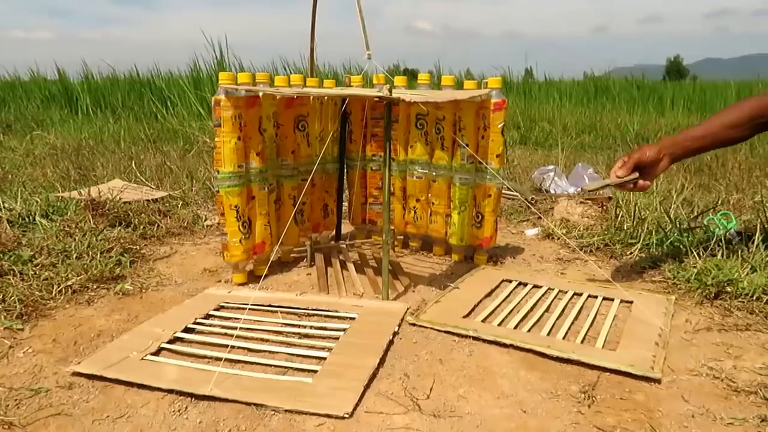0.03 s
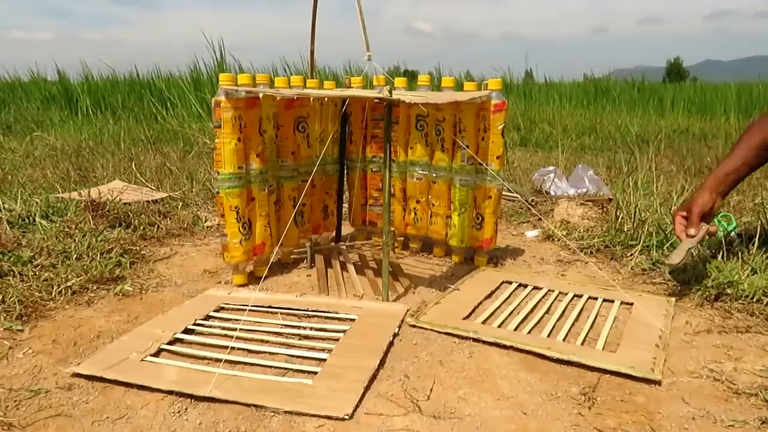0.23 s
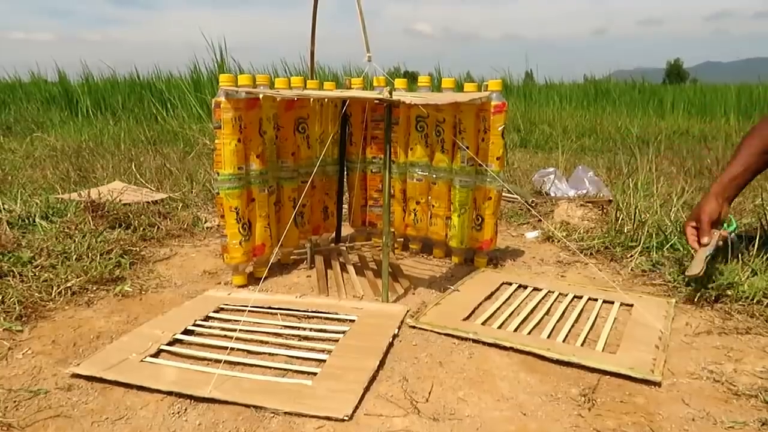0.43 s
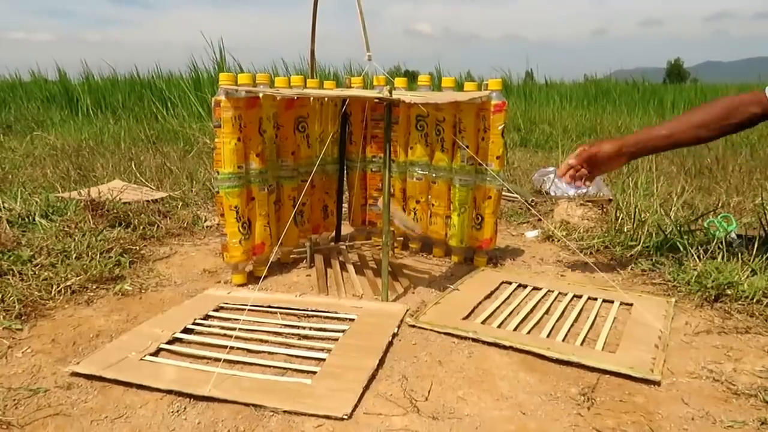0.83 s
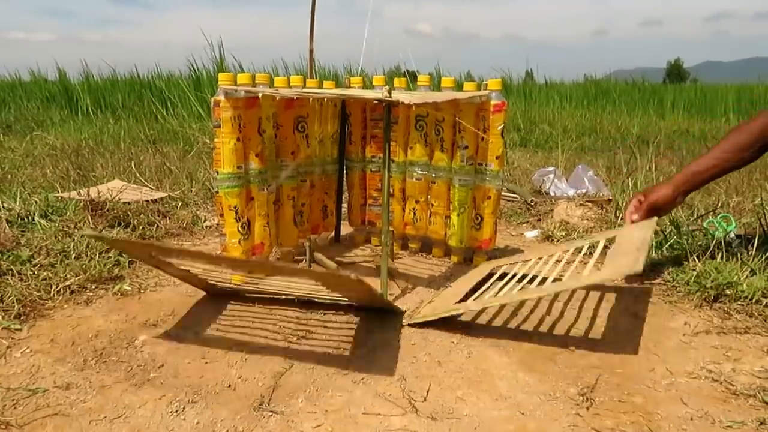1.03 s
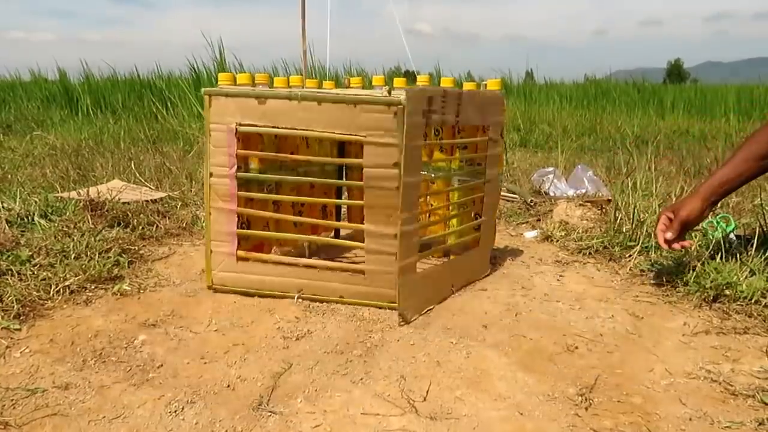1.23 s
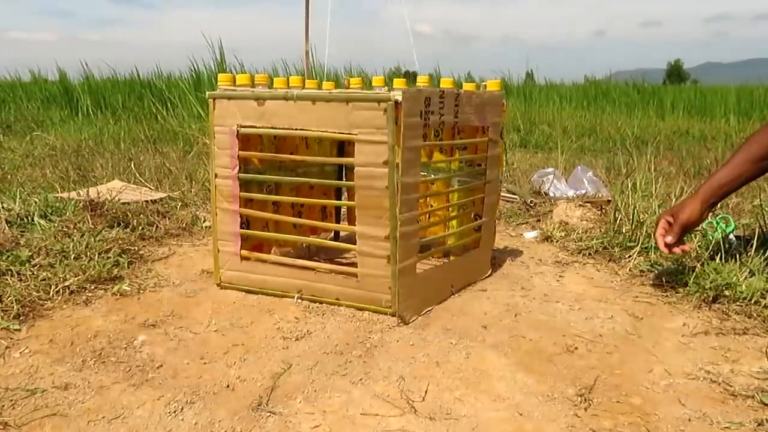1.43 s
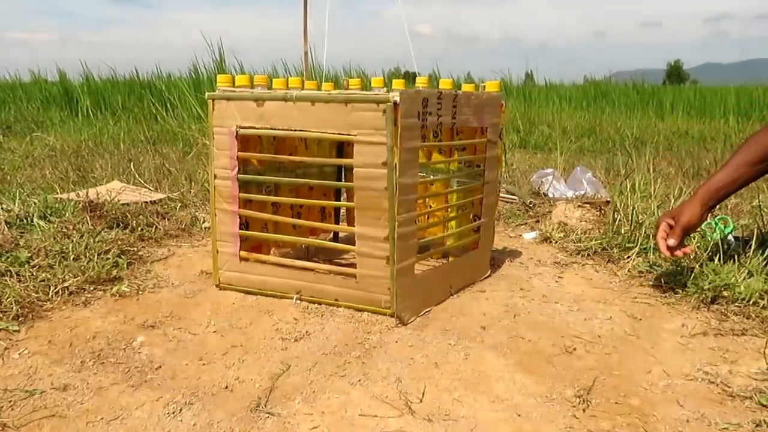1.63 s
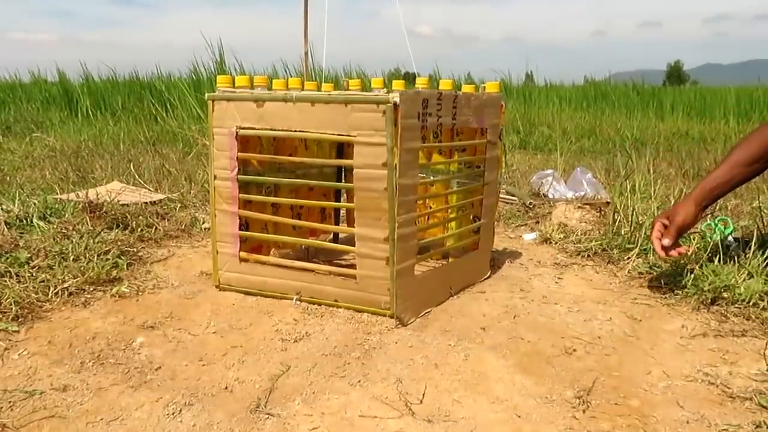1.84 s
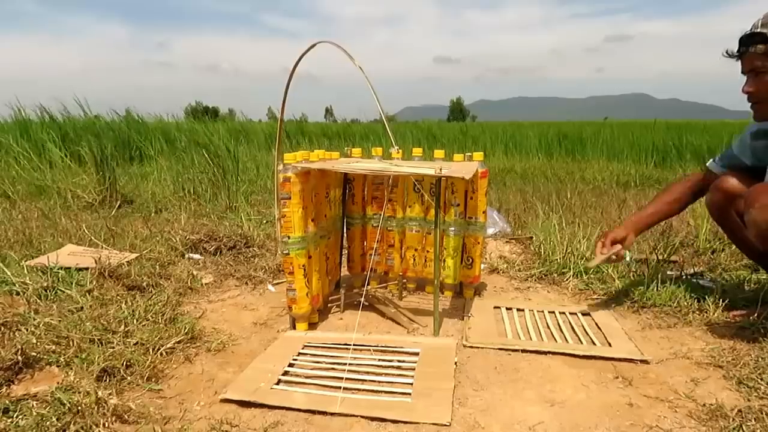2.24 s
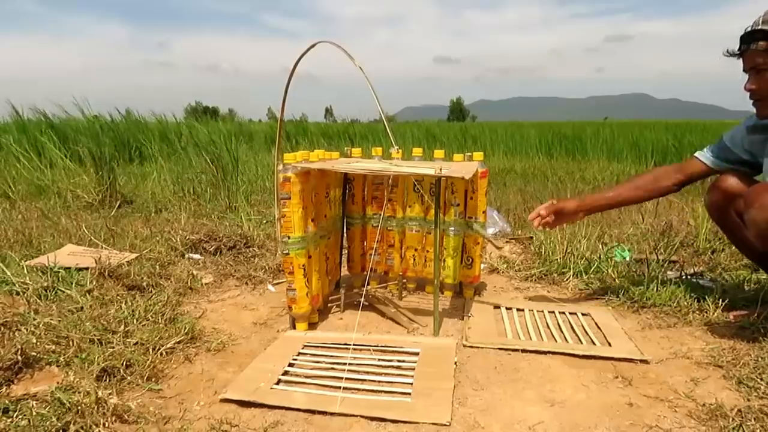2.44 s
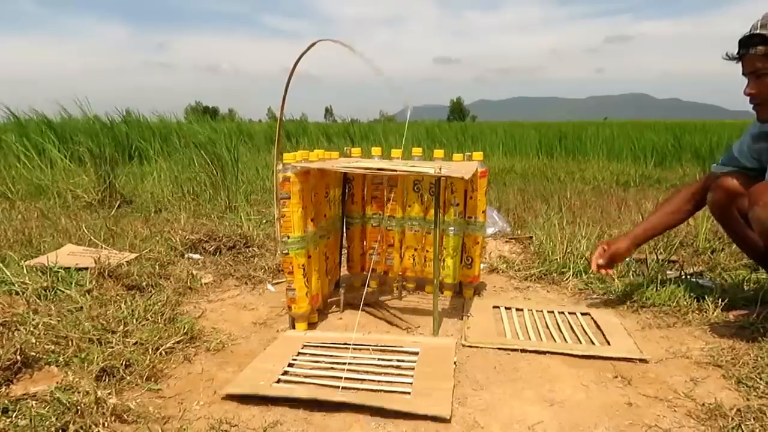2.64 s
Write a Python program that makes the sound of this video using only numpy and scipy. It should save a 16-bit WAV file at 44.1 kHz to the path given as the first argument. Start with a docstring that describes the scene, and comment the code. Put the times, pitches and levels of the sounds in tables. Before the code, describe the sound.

A cardboard trap snaps shut outdoors. For the first second, low wind rumbles on the microphone over faint grass hiss. At about 1.1 seconds cords rasp and crack, and the doors swing up with rustles, knocks and tiny squeaks. The loudest slap comes at 1.4 seconds, settling by 1.6. Just after 2 seconds the hiss drops away and the wind becomes a dull, lumpy flutter.

```python
"""A spring trap in a windy field

Grass hisses and wind buffets the microphone as a trap of cardboard and bamboo fires. Cords rasp,
snap and squeak over the frame, and two cardboard doors swing up rustling, slap shut and settle.
After about two seconds the hiss abruptly drops away and the wind becomes a higher, dull flutter."""
import sys
import numpy as np
from scipy import signal
from scipy.fft import rfft, irfft
from scipy.io import wavfile
from scipy.ndimage import uniform_filter1d, minimum_filter1d

SR = 44100
rng = np.random.default_rng(int(sys.argv[2]) if len(sys.argv) > 2 else 0)


def bounce(signal):
    """Save signal as a 16-bit WAV file at the path given by the first command-line argument."""
    frames = np.transpose(np.atleast_2d(signal))
    limited = np.clip(frames, -1, 1)
    pcm = np.round(limited * 32767).astype(np.int16)
    wavfile.write(sys.argv[1], SR, pcm)


N = 119070
TIME = np.arange(N) / SR
CHANGE_S, FADE_S = 2.057, 0.00406  # when the hiss and wind switch; how long a quick fade takes


def amp(db):
    """Turns decibels into a number to multiply by."""
    return 10 ** (np.asarray(db) / 20)


def unit(x):
    """Scales a signal to an average power of 1."""
    return x / np.sqrt(np.mean(x ** 2) + 1e-20)


def add(mix, start_s, sound):
    """Mixes a sound in at a given time."""
    part = mix[..., max(round(start_s * SR), 0):][..., :sound.shape[-1]]
    part += sound[..., :part.shape[-1]]


def fade_in(at_s):
    """A quick, smooth step from 0 to 1."""
    return .5 + .5 * np.tanh((TIME - at_s) / FADE_S * 2)


def level(rows, column=1):
    """Joins a table's levels into a volume curve that fades quickly at both ends."""
    rows = np.array(rows)
    gate = fade_in(rows[0, 0]) * (1 - fade_in(rows[-1, 0] + FADE_S))
    return gate * amp(np.interp(TIME, rows[:, 0], rows[:, column]))


def colour(x, tone):
    """Makes some pitches stronger than others, then scales to a power of 1."""
    tone_hz, db = np.transpose(tone)
    hz = np.fft.rfftfreq(x.shape[-1], 1 / SR)
    gain = amp(np.interp(np.log(hz + 1), np.log(tone_hz), db))
    return unit(irfft(rfft(x) * gain, x.shape[-1]))


def highpass(x, hz):
    """Removes the bass."""
    return signal.sosfilt(signal.butter(2, hz, 'high', fs=SR, output='sos'), x)


def stereo_noise(likeness, length=N):
    """Left and right noise, from unrelated (likeness 0) to identical (1)."""
    shared, left, right = rng.standard_normal((3, N))[:, :length]
    return np.sqrt(likeness) * shared + np.sqrt(1 - likeness) * np.array([left, right])


def wander(hz):
    """A smooth random wobble, up to about this many times a second."""
    rolloff = 1 + (np.fft.rfftfreq(N, 1 / SR) / hz) ** 4
    return unit(irfft(rfft(rng.standard_normal(N)) / rolloff, N))


def steadied(x, span_s):
    """Evens out chance swells that last longer than the span."""
    size = max(int(span_s * SR), 2)
    power = uniform_filter1d(uniform_filter1d((x ** 2).mean(0), size), size)
    return x / np.sqrt(abs(power) + 1e-9)


# The tone of the grass, early and late, and of the far wind. Each row: pitch in Hz, strength in dB.
HISS_TONE = [(180, -26), (300, 5.5), (431, 0), (700, -4), (968, -3), (2320, -7.5), (10100, -26),
             (12500, -33), (15500, -35.5)]
LATE_HISS_TONE = [(300, 0), (2000, 3), (4000, -2), (8000, -13), (12000, -26), (15500, -17)]
ROAR_TONE = [(100, -14.5), (240, 1.5), (450, -16), (2000, -73)]
# The breeze swelling in the grass. Each row: time in seconds, change of level in dB.
BREEZE = [(.1, 1.5), (.3, 1.9), (.42, -1.5), (.62, 0), (.76, 3.1), (.9, 2), (1.65, 1.5), (1.9, 2.5),
          (2.02, 2)]


def field(start_s=.068, hiss_db=-54, roar_db=-57.5, late_hiss_db=-66):
    """Grass hisses in the breeze over the low roar of far wind; later only a fainter hiss is left."""
    swell_db = np.interp(TIME, *np.transpose(BREEZE))
    hiss = amp(hiss_db + swell_db) * highpass(colour(stereo_noise(0.55), HISS_TONE), hz=201)
    roar = amp(roar_db) * colour(stereo_noise(0.63), ROAR_TONE)
    late_hiss = amp(late_hiss_db) * colour(stereo_noise(0.14), LATE_HISS_TONE)
    return np.where(TIME < CHANGE_S, (hiss + roar) * (TIME > start_s), late_hiss)


# How much the wind differs between left and right.
# Each row: time in seconds, level of the differing part against the shared part in dB.
WIND_WIDTH = [(0, -3.5), (.36, 4.5), (.42, -12.5), (.65, -3), (.95, -7), (1.1, -3.5), (1.45, -8.5),
              (2.04, -7.5), (2.065, 6), (2.335, 3.5), (2.355, -10), (2.7, -14)]


def eddies(tone, span_s, db_per_octave=5.5, top_hz=800):
    """Air swirls at the microphone's two openings; they share small swirls less than large ones."""
    thinner_tone = [(hz, db + db_per_octave * np.log2(min(hz / top_hz, 1))) for hz, db in tone]
    shared = steadied(colour(rng.standard_normal((1, N)), tone), span_s)
    differing = steadied(colour(rng.standard_normal((1, N)), thinner_tone), span_s)
    width = amp(np.interp(TIME, *np.transpose(WIND_WIDTH)))
    return shared + width * differing * np.array([[1], [-1]])


# The rise and fall of the early wind. Each row: time in seconds, level in dB.
RUMBLE_LEVELS = [(0.07, -33), (0.108, -30.5), (0.218, -26), (0.252, -38.5), (0.318, -20.5), (0.378, -25.5),
                 (0.396, -30.5), (0.456, -42.5), (0.556, -29), (0.612, -36), (0.638, -48), (0.7, -25.5),
                 (0.732, -46.5), (0.772, -50), (0.8, -29.5), (0.86, -22.5), (0.882, -37), (0.904, -51),
                 (0.938, -28.5), (0.988, -45.5), (1.176, -29.5), (1.204, -37), (1.302, -31), (1.346, -39),
                 (1.424, -29.5), (1.446, -47), (1.468, -40.5), (1.712, -50.5), (1.768, -38.5),
                 (1.934, -55.5), (1.984, -30.5), (2.057, -26.5)]
# The deep tone of the wind. Each row: pitch in Hz, strength in dB.
RUMBLE_TONE = [(15, -5), (28, -5), (55, 2.5), (125, 0.5), (190, -8.5), (270, -22), (400, -37.5),
               (800, -62.5), (2000, -97.5)]


def rumble():
    """Wind blowing on the microphone makes a deep, uneven rumble."""
    return level(RUMBLE_LEVELS) * (1 - fade_in(CHANGE_S)) * eddies(RUMBLE_TONE, span_s=0.05)


# Strong gusts. Each row: time of the peak in seconds, half length in seconds, relative level in dB.
GUSTS = [(0.293, 0.018, -30.5), (0.329, 0.003, -14.5), (0.373, 0.0061, -21.5), (0.646, 0.011, -25),
         (0.686, 0.0038, -26), (0.806, 0.005, -25), (0.853, 0.0087, -21), (0.875, 0.0044, -17.5),
         (0.919, 0.0052, -30.5)]
# The tone of a gust. Each row: pitch in Hz, strength in dB.
GUST_TONE = [(30, -16), (100, 7), (200, 5), (290, -4.5), (420, -16), (600, -31.5), (2500, -90)]


def gusts(gain_db=2):
    """Short gusts swell and die away on the microphone."""
    swells = sum(amp(gain_db + db) * np.exp(-.5 * ((TIME - peak_s) / half_s) ** 2)
                 for peak_s, half_s, db in GUSTS)
    return swells * eddies(GUST_TONE, span_s=0.031)


# Faint ticks of dry stalks. Each row: start in seconds, level in dB, pitch in Hz.
TICKS = [(.379, -38, 2550), (.524, -43.5, 2760), (.697, -41.5, 2650), (1.706, -48.5, 6300),
         (1.831, -41, 2360), (1.858, -45, 3965), (2.047, -42, 2797)]


def tick(db, hz, rise_s=0.00026, decay_s=0.003):
    """A dry stalk clicks softly."""
    t = np.arange(1024) / SR
    tone = [(hz / 4, -20), (hz * 0.48, -7), (hz, 0), (hz * 1.6, -10), (hz * 4, -25)]
    click = colour(stereo_noise(.2, len(t)), tone)
    return amp(db) * click * (1 - np.exp(-t / rise_s)) * np.exp(-t / decay_s)


def slips(per_s, spread_db, side_db):
    """Rubbing surfaces make many tiny clicks at random times, nearly alike left and right."""
    mid, side = rng.standard_normal((2, N))
    slipping = rng.random(N) < per_s / SR
    size = amp(spread_db * np.minimum(rng.exponential(1, N), 3))
    return slipping * size * (np.sign(mid) + amp(side_db) * side * np.array([[1], [-1]]))


# Cords running over the frame. Each row: time in seconds, level in dB.
RASP_LEVELS = [(1.059, -37.5), (1.063, -23.5), (1.072, -27), (1.082, -30.5), (1.086, -15.5), (1.092, -22),
               (1.099, -14.5), (1.107, -21), (1.113, -29), (1.122, -40), (1.135, -53), (1.165, -34.5),
               (1.170, -51), (1.179, -36.5), (1.186, -55.5)]
# The tone of their rasp. Each row: pitch in Hz, strength in dB.
RASP_TONE = [(300, -6.5), (600, -13), (1000, -8.5), (1500, -5), (2700, -0.5), (3500, -3), (4300, -8),
             (7600, -8.5), (10000, -13.5), (12000, -19), (14500, -36.5), (15500, -63)]


def cords():
    """Cords stick and slip over the frame as the bamboo spring pulls them."""
    rasp = colour(slips(per_s=6000, spread_db=-3.3, side_db=-21.5), RASP_TONE)
    return level(RASP_LEVELS) * steadied(highpass(rasp, hz=400), span_s=0.0054)


# The doors moving. Each row: time in seconds, level of the rustle in dB, level of the flexing in dB.
SWING_LEVELS = [(1.06, -60.5, -59), (1.10, -35.5, -39.5), (1.125, -37.5, -25), (1.156, -31, -38),
                (1.19, -42.5, -45.5), (1.22, -33, -34), (1.27, -39.5, -43), (1.305, -34, -34.5),
                (1.33, -40, -47.5), (1.386, -39, -34.5), (1.391, -42.5, -21.5), (1.408, -23.5, -29),
                (1.422, -31.5, -16.5), (1.447, -39.5, -24.5), (1.47, -42.5, -34.5), (1.485, -55.5, -33),
                (1.52, -42.5, -36), (1.545, -64, -41.5), (1.61, -60.5, -56)]
# The tones of rustling and flexing cardboard. Each row: pitch in Hz, strength in dB.
RUSTLE_TONE = [(300, 5.5), (500, -1), (1400, -1.5), (2000, -6.5), (2800, -9.5), (3500, -8), (5700, -16),
               (8000, -25.5), (12600, -33), (15500, -50)]
FLEX_TONE = [(30, -13.5), (70, -18), (120, 0.5), (250, -5.5), (350, 0.5), (500, -13.5), (800, -21),
             (1600, -45.5), (4000, -80.5)]


def doors():
    """Cardboard rustles and its panels flex as the doors swing and shudder."""
    rubbing = colour(slips(per_s=2200, spread_db=0, side_db=-20.5), RUSTLE_TONE)
    rustle = steadied(highpass(rubbing, hz=399), span_s=0.018)
    flex = steadied(colour(stereo_noise(0.99), FLEX_TONE), span_s=0.0072)
    return level(SWING_LEVELS) * rustle + level(SWING_LEVELS, column=2) * flex


# Sharp snaps. Each row: start in seconds, level in dB, fading time in seconds.
SNAPS = [(1.0618, -23.5, 0.0048), (1.0845, -20, 0.0032), (1.0955, -15, 0.0011), (1.1149, -11, 0.0034),
         (1.2868, -18, 0.0028), (1.2985, -23.5, 0.0035), (1.4335, -21.5, 0.0016)]
# The tone of a snap. Each row: pitch in Hz, strength in dB.
SNAP_TONE = [(300, -8.5), (1200, 3), (2200, 4), (3200, 5), (5500, 3.5), (8000, -5), (11000, -23),
             (15000, -37)]


def snap(db, decay_s, rise_s=0.00049):
    """Cord and bamboo give a short, bright crack."""
    t = np.arange(4096) / SR
    burst = steadied(colour(stereo_noise(0.95, len(t)), SNAP_TONE), span_s=0.0043)
    return amp(db) * burst * (1 - np.exp(-t / rise_s)) * np.exp(-t / decay_s)


# Cardboard slaps. Each row: start in seconds, level in dB, added brightness in dB per octave,
# relative level of the crunch in dB.
SLAPS = [(1.1155, -10.5, 7.5, -11), (1.12, -13.5, -1.5, -7.5), (1.1245, -24, -6.5, -4.5),
         (1.153, -22, 0.5, -5.5), (1.304, -20, 8, -13.5), (1.389, -29.5, 10, -5), (1.4111, 2.5, 0, -16.5),
         (1.4188, -18, -7.5, -7), (1.4342, -17, -2.5, -8), (1.441, -13.5, -1.5, -9.5),
         (1.4605, -33.5, 5.5, -7.5), (1.499, -43, 11, -5), (1.5175, -24, -1.5, -8.5)]
# The notes a door rings with. Each row: pitch in Hz, strength in dB, seconds to fade by 60 dB.
DOOR_NOTES = [(320.6, -30.5, 0.19), (586, -40.5, .06), (840, -22, .07), (1240, -32.5, 0.04),
              (1106, -12.5, 0.011), (1259, 2.5, 0.0087), (1880, -13, 0.024), (2823, -21.5, 0.039),
              (3406, -9, 0.0092), (4800, -24.5, 0.0098)]
# The tone of crushed fibres. Each row: pitch in Hz, strength in dB.
CRUNCH_TONE = [(200, -22.5), (1300, 23.5), (2200, 12), (3500, -11), (5000, -23.5), (8000, -40),
               (12000, -39), (15500, -54)]


def slap(db, brightness, crunch_db, crunch_s=0.0065, tail_db=-20, tail_s=.02, rise_s=0.00028):
    """A door's edge lands: it rings briefly, fibres crunch, and the box scatters a short tail."""
    t = np.arange(6000) / SR
    ring = 0
    for hz, note_db, ring_s in DOOR_NOTES:
        detuned_hz = hz * (1 + .02 * rng.standard_normal())
        ring += amp(note_db - 60 * t / ring_s) * np.sin(2 * np.pi * detuned_hz * t)
    crunch = steadied(colour(stereo_noise(1, len(t)), CRUNCH_TONE), span_s=.002)
    fade = np.exp(-t / crunch_s) + amp(tail_db) * np.exp(-t / tail_s)
    padded = np.pad(ring + amp(crunch_db) * crunch * fade, ((0, 0), (0, len(t))))
    # Tip the balance of bass and treble like a seesaw around 1300 Hz.
    octaves = np.log2(np.clip(np.fft.rfftfreq(2 * len(t), 1 / SR), 300, 8000) / 1300)
    tilted = irfft(rfft(padded) * amp(brightness * octaves))[:, :len(t)]
    return amp(db) * (1 - np.exp(-t / rise_s)) * tilted


# Brief squeaks. Each row: start and length in seconds, first and last pitch in Hz, level in dB.
SQUEAKS = [(1.166, 0.016, 5150, 5220, -37), (1.166, 0.028, 6600, 6500, -42.5),
           (1.166, 0.013, 7850, 7950, -42.5), (1.335, 0.043, 2120, 2015, -41.5),
           (1.365, 0.078, 1800, 1650, -37)]


def squeak(length_s, first_hz, last_hz, db, wobble_hz=110, wobbles_per_s=1000, catches_per_s=131):
    """A cord sings unsteadily as it catches and slides on bamboo."""
    progress = np.arange(0, length_s, 1 / SR) / length_s
    glide_hz = first_hz + (last_hz - first_hz) * progress
    hz = glide_hz + wobble_hz * wander(wobbles_per_s)[:len(progress)]
    grip = unit(abs(wander(catches_per_s)[:len(progress)]))
    swell = np.sqrt(2 * abs(np.sin(np.pi * progress)))
    return amp(db) * grip * swell * np.sin(2 * np.pi * np.cumsum(hz) / SR)


# Late buffets of wind. Each row: start in seconds, relative levels of the thump and crackle in dB.
BUFFETS = [(2.056, -24.5, -25.5), (2.066, -20, -27.5), (2.087, -24, -22), (2.1, -15, -28),
           (2.127, -17, -29), (2.14, -15, -29), (2.18, -17.5, -39.5), (2.238, -28.5, -31),
           (2.269, -14.5, -23), (2.325, -14.5, -36.5), (2.403, -27.5, -42), (2.434, -19.5, -27),
           (2.459, -18.5, -32), (2.502, -22, -36.5), (2.517, -20.5, -34.5), (2.549, -20, -29.5),
           (2.568, -17, -33.5), (2.64, -26, -36.5)]
# The tones of the thump and the crackle. Each row: pitch in Hz, strength in dB.
THUMP_TONE = [(30, -37), (220, 9), (450, 2.5), (750, -32), (2500, -84)]
CRACKLE_TONE = [(150, -30), (450, 10), (700, 5.5), (1200, -8), (1800, -27), (6000, -64.5)]


def buffets(rise_s=0.0028, gain_db=-5.5):
    """Single swirls of air hit the microphone, each a sudden push and a slower release."""
    thumps, crackles = np.zeros((2, N))
    for start_s, thump_db, crackle_db in BUFFETS:
        age = np.clip((TIME - start_s) / rise_s, 0, 20)
        push = amp(gain_db) * np.tanh(2 * age) * age * np.exp(1 - age)
        thumps += amp(thump_db) * push
        crackles += amp(crackle_db) * push
    return thumps * eddies(THUMP_TONE, span_s=.0086) + crackles * eddies(CRACKLE_TONE, span_s=.0034)


# The late wind. Each row: time in seconds, relative levels of the rumble and the flutter in dB.
LATE_WIND_LEVELS = [(2.06, -30, -35), (2.094, -21.5, -39.5), (2.15, -28, -34.5), (2.332, -35, -36),
                    (2.354, -68, -48), (2.4, -76, -42.5), (2.44, -60, -34.5), (2.56, -53.5, -37.5),
                    (2.585, -58, -50.5), (2.65, -47, -40.5), (2.675, -54, -49.5), (2.7, -43.5, -47)]
# The tone of the flutter. Each row: pitch in Hz, strength in dB.
FLUTTER_TONE = [(30, -34.5), (120, 1), (270, 5), (480, -0.5), (750, -15.5), (1100, -26), (1600, -43.5),
                (6000, -89)]


def late_wind(rumble_db=-3.5, flutter_db=1.5, lump_db=2.5, lumps_per_s=85):
    """Wind on the microphone makes a dull, lumpy flutter while its rumble sinks away."""
    low_rumble = amp(rumble_db) * level(LATE_WIND_LEVELS) * eddies(RUMBLE_TONE, span_s=0.05)
    lumps = amp(flutter_db + lump_db * wander(lumps_per_s))
    flutter = lumps * level(LATE_WIND_LEVELS, column=2) * eddies(FLUTTER_TONE, span_s=0.062)
    return fade_in(CHANGE_S) * (low_rumble + flutter)


# The notes of the trap's slats and bottles. Each row: pitch in Hz, width in Hz, strength in dB.
FRAME_NOTES = [(600, 14, -10.5), (770, 29, 2), (1078, 15, -8.5), (1308, 13, -3.5), (1800, 6.4, -1),
               (2460, 11, -2), (3160, 22, -7.5), (3050, 75, 0.5), (3080, 73, -6), (6750, 20, 4),
               (6014, 45, 2.5), (7800, 37, 8.5)]


def frame(x, ring_db=-12, direct_db=-1):
    """Slats and bottles ring along with everything that shakes the trap."""
    ring = sum(amp(db) * signal.lfilter(*signal.iirpeak(hz, hz / width_hz, SR), x)
               for hz, width_hz, db in FRAME_NOTES)
    return amp(direct_db) * x + amp(ring_db) * ring


def outdoors(x, echo_db=-27, decay_s=0.036, echoes_per_s=2000):
    """Ground and grass scatter back many weak, quick echoes."""
    t = np.arange(SR // 2) / SR
    echoes = rng.standard_normal((2, len(t))) * (rng.random((2, len(t))) < echoes_per_s / SR)
    echoes *= np.exp(-t / decay_s) * (t > .003)
    echoes /= np.linalg.norm(echoes[0])
    return x + amp(echo_db) * signal.fftconvolve(x, echoes, axes=1)[:, :N]


def scene():
    """Mixes the trap and the stalks with the wind and the field."""
    trap = cords() + doors()
    for table, source in ((SNAPS, snap), (SLAPS, slap), (SQUEAKS, squeak), (TICKS, tick)):
        for start_s, *settings in table:
            add(trap, start_s, source(*settings))
    return outdoors(frame(trap)) + rumble() + gusts() + buffets() + late_wind() + field()


def record(dry, treble_hz=12550, ceiling=.98, top_hz=15400):
    """The microphone softens the treble; loud peaks are eased down and the very top is cut off."""
    dull = signal.sosfilt(signal.butter(3, treble_hz, fs=SR, output='sos'), dry)
    safe_gain = np.minimum(ceiling / (abs(dull).max(0) + 1e-9), 1)
    held_gain = minimum_filter1d(safe_gain, size=65)
    limited = dull * uniform_filter1d(uniform_filter1d(held_gain, size=33), size=33)
    top_cut = signal.firwin(255, top_hz, window=("kaiser", 9), fs=SR)
    return signal.oaconvolve(limited, top_cut[None], "same")


dry = scene()
out = record(dry)
bounce(out)
```